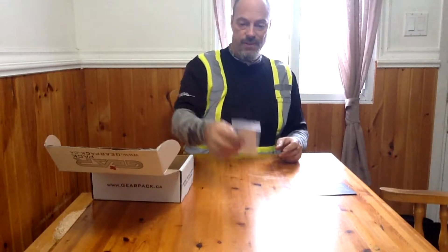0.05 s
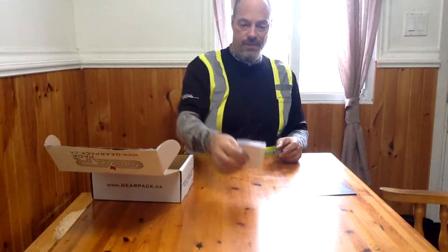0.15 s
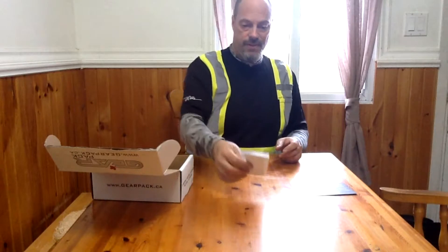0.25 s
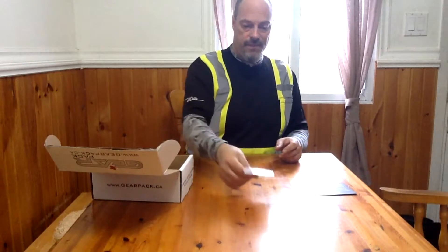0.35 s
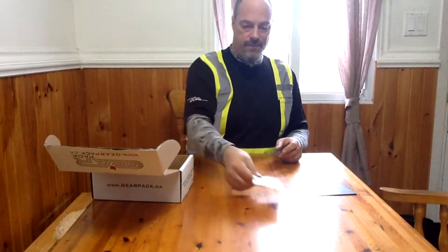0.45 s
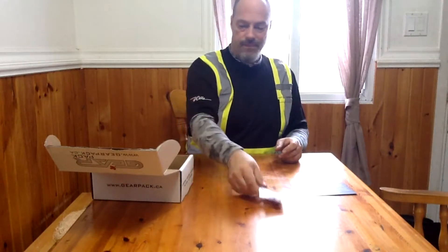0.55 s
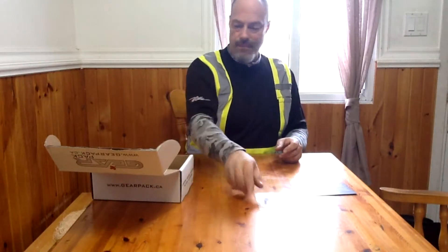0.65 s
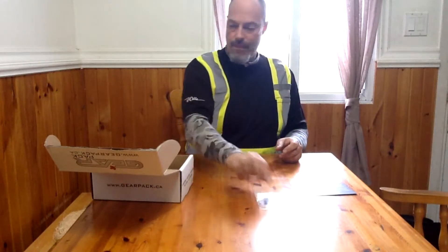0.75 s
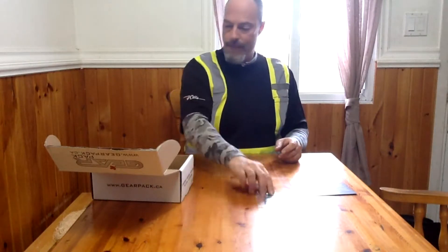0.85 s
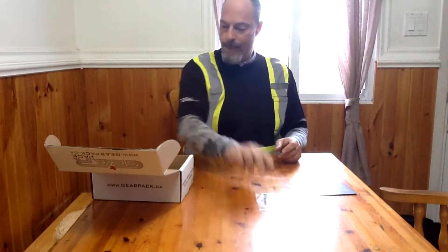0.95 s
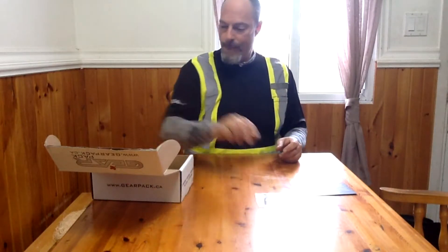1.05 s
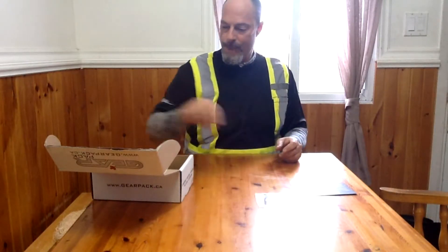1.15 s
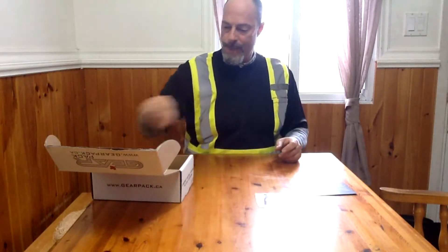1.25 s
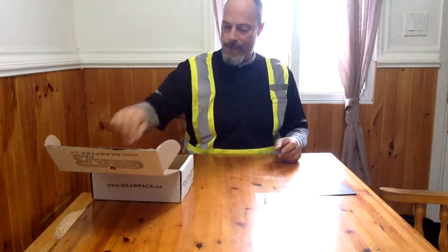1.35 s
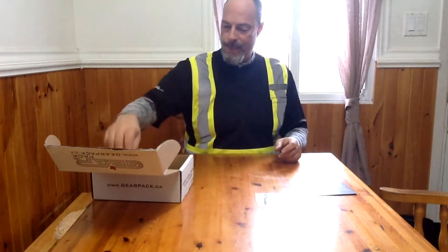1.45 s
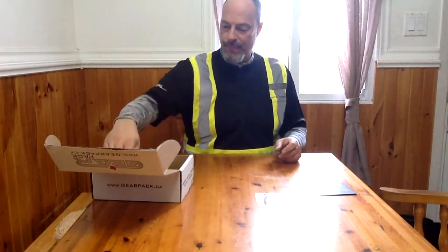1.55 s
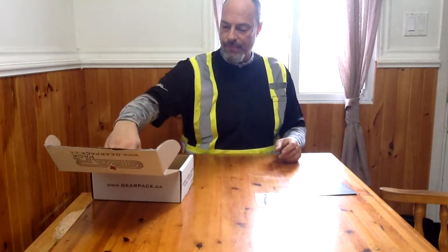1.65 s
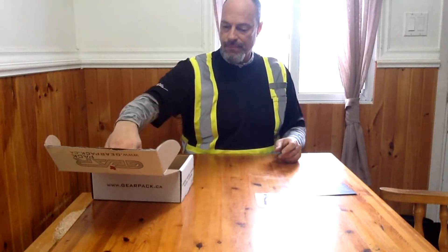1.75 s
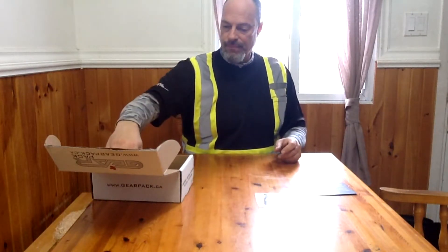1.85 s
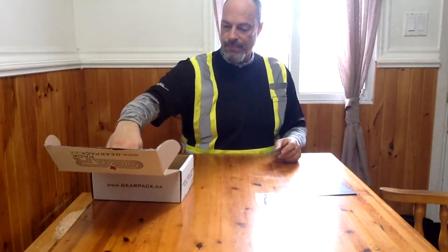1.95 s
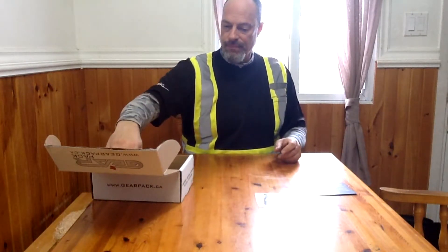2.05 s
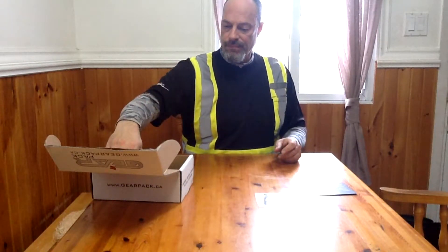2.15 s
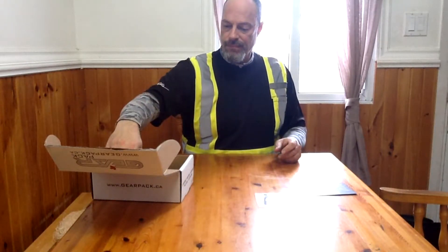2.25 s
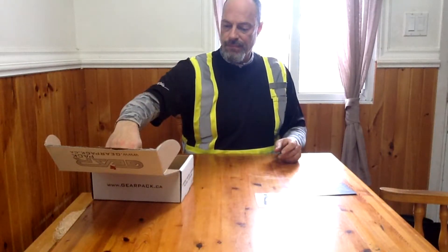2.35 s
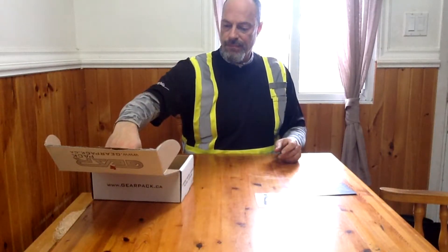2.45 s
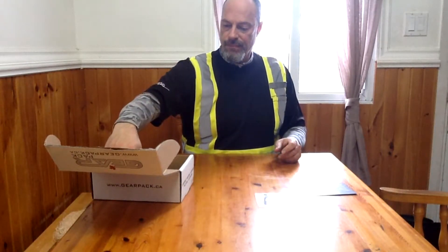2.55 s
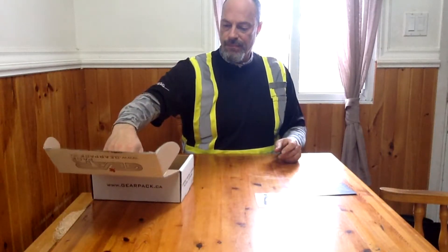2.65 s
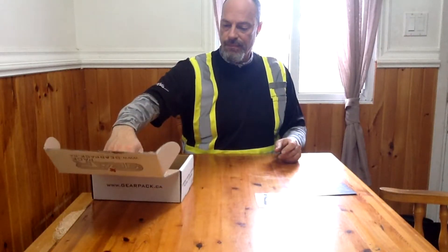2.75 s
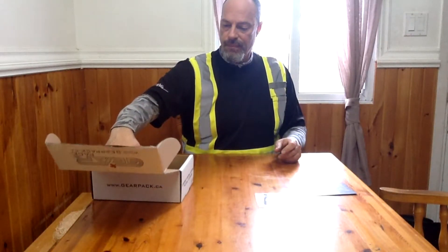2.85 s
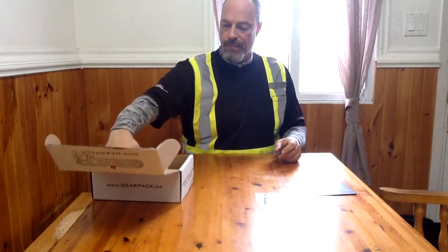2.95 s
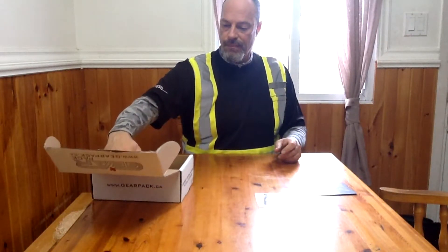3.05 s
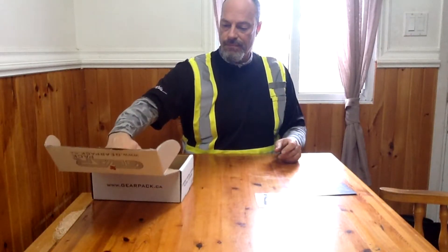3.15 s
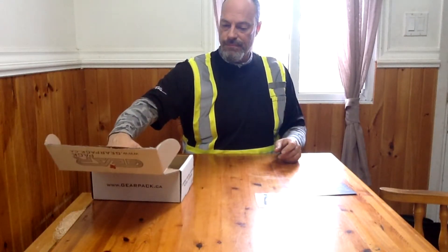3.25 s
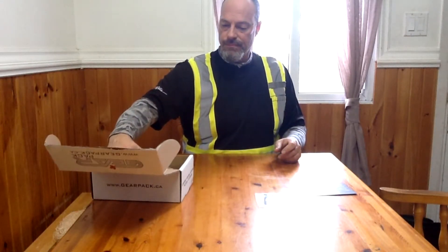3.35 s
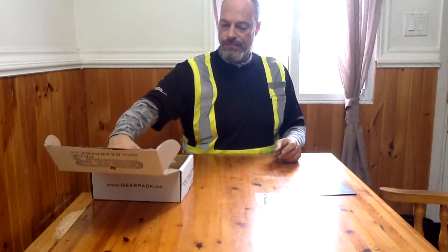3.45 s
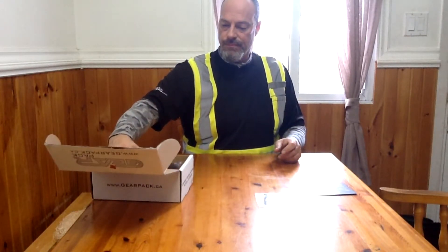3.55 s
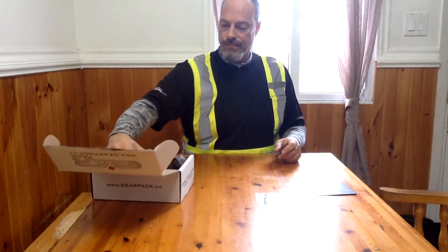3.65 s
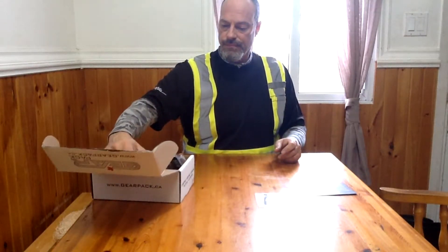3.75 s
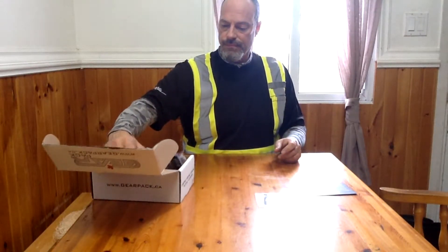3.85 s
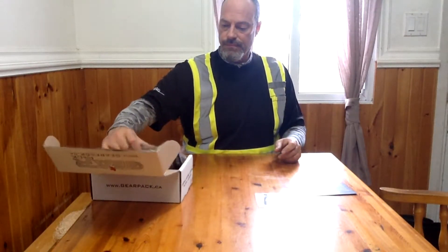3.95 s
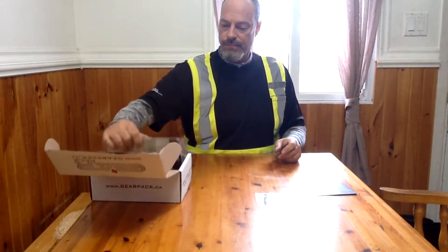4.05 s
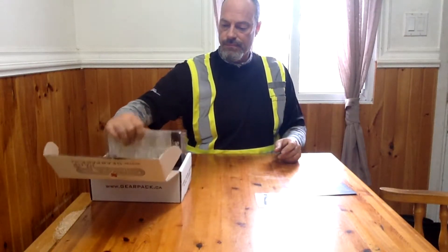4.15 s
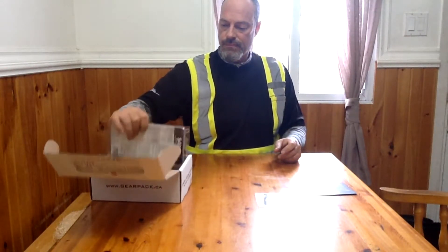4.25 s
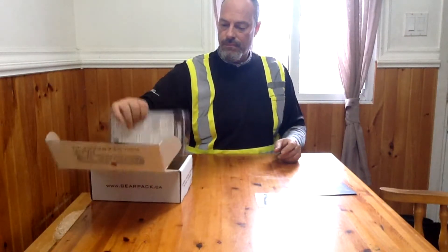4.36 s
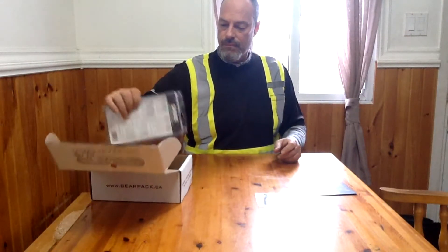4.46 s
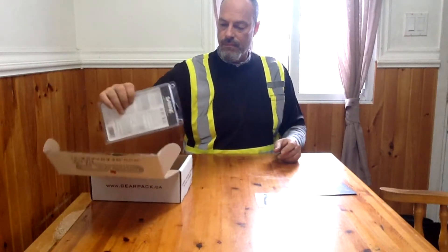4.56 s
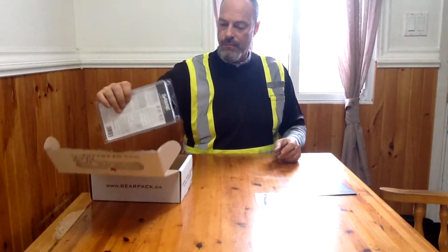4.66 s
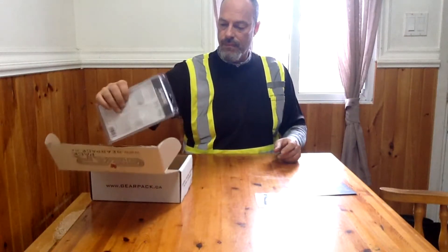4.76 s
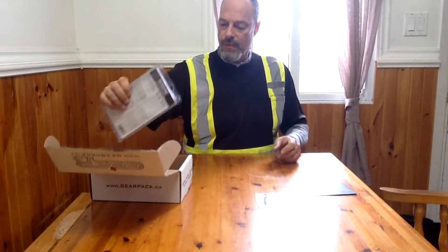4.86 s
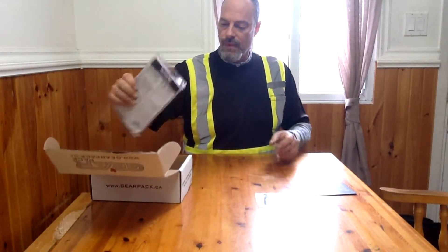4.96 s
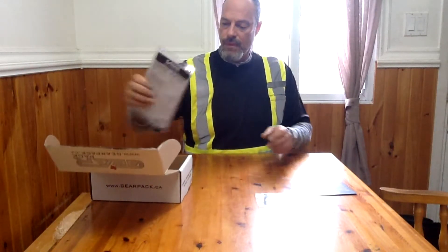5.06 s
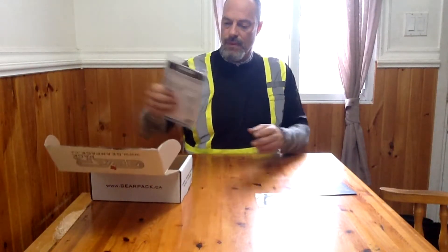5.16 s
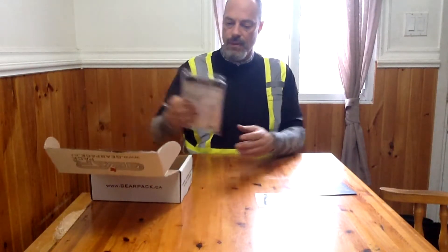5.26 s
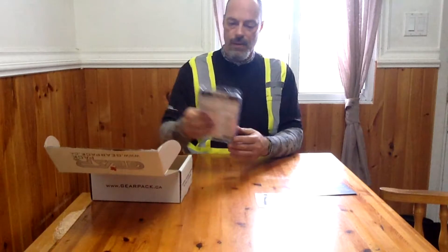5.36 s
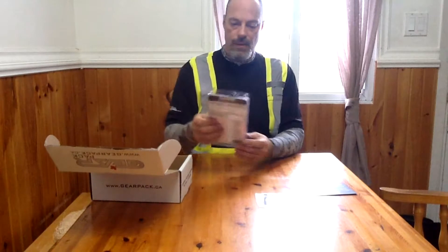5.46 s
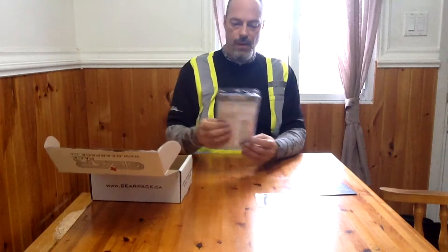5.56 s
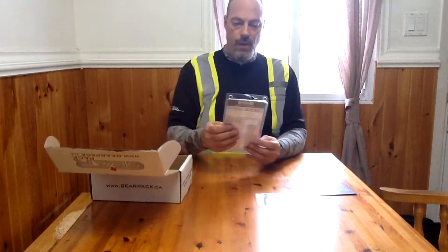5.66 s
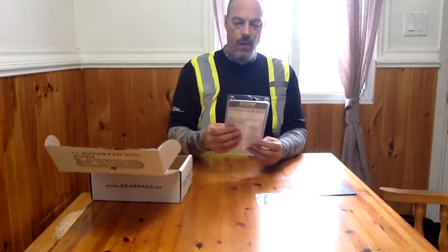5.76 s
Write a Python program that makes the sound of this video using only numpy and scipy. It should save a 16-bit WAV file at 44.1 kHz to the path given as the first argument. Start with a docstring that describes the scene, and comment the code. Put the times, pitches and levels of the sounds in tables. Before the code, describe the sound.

One hard slap on wood, followed by soft cardboard scraping, knocks and plastic film crackles in a small, quietly humming room.

```python
"""Unpacking a wrapped card

A hand slaps a small packet on a wooden table, rummages in a cardboard box and lifts out a film-wrapped card.
Film ticks and snaps and the hard click of the slap are coloured noise bursts; cardboard knocks and table
thuds are decaying modes. Scrape, rustle and rubbing are clumped random slips, filtered or rung through
the resonances of box and card. A small hard room answers with a sparse decaying tail, over hum and hiss.
"""
import sys
import numpy as np
from scipy import signal
from scipy.io import wavfile
from scipy.ndimage import uniform_filter1d

SR = 44100
rng = np.random.default_rng(int(sys.argv[2]) if len(sys.argv) > 2 else 0)


def bounce(signal):
    """Save signal as a 16-bit WAV file at the path given by the first command-line argument."""
    frames = np.transpose(np.atleast_2d(signal))
    limited = np.clip(frames, -1, 1)
    pcm = np.round(limited * 32767).astype(np.int16)
    wavfile.write(sys.argv[1], SR, pcm)


N = 255515  # length in samples


def gain_of(db):
    """Level law: an amplitude ratio is ten to the power of dB / 20."""
    return 10 ** (np.asarray(db) / 20)


def evened(x):
    """Normalisation by effective value: scales a signal to rms 1."""
    return x / np.sqrt(np.mean(x ** 2) + 1e-20)


def add(mix, start_s, sound):
    """Superposition: adds a sound to the mix at its start time, cut at the end of the mix."""
    part = mix[round(start_s * SR):][:len(sound)]
    part += sound[:len(part)]


def read(points, hz):
    """Interpolation of a table along a logarithmic frequency axis."""
    point_hz, value = np.transpose(points)
    return np.interp(np.log(hz + 1), np.log(point_hz + 1), value)


def colour(x, points, size=2048):
    """Minimum-phase filtering: the spectrum is shaped causally, so clicks stay sharp."""
    bin_hz = abs(np.fft.fftfreq(size, 1 / SR))
    log_gain = np.log(gain_of(np.maximum(read(points, bin_hz), -100)))
    # the Hilbert transform of the log gain supplies the minimum phase
    response = np.exp(np.conj(signal.hilbert(log_gain)))
    taps = np.fft.ifft(response).real
    return signal.oaconvolve(x, taps)[:len(x)]


def ring(x, hz, width_hz):
    """Damped resonance: one complex pole, with a gain of about 1 at its peak."""
    radius = np.exp(-np.pi * width_hz / SR)
    pole = radius * np.exp(2j * np.pi * hz / SR)
    return 2 * signal.lfilter([1 - radius], [1, -pole], x).real


def impulse(t):
    """Unit impulse: a single sample of 1 at time zero."""
    return 1. * (t == 0)


# a brighter burst trades ring for treble around these shares
CRACK_RING_DB, CRACK_TREBLE_DB = -1, -5
# film and stiff folds cracking, quick ticks to longer snaps,
# and the hard click of the packet slapping the table at .8427:
# start_s, level_db, ring_hz, brightness_db, time_to_peak_ms, room_share_db
CRACKS_AND_CLICK = [(0.3508, -33.5, 3940, 4, 0.12, 3.5), (0.4303, -30, 2960, -0.5, 0.27, 1),
                    (.584, -36, 2080, -3.5, 2.6, 1.5), (.5877, -35.5, 1920, 8, 1.5, -1.5),
                    (.6876, -29.5, 2000, 3.5, 0.64, 1), (.839, -24.5, 2020, -2, 6.9, 2),
                    (.8427, -5.5, 3350, 6.5, .11, -9), (2.3414, -44, 1840, -3, 0.16, 3),
                    (2.489, -45, 1800, -12, 0.11, 8), (2.6494, -50.5, 1810, 4, 2.5, 3),
                    (2.759, -41, 4040, -1.5, 2.1, 3.5), (2.814, -41, 2160, -13.5, .17, 1.5),
                    (2.894, -46, 2990, 0, 3, -3), (2.9745, -46, 2280, -4, 0.74, 8),
                    (3.021, -41, 2180, -1.5, 1.3, 4.5), (3.081, -35.5, 4100, 1, 2.8, 1.5),
                    (3.1943, -42.5, 3020, -6, 1.3, 1), (3.258, -38.5, 2680, 4, 0.93, -7),
                    (3.405, -24, 2800, -3, 4.7, -1), (3.579, -22.5, 2670, 0.5, 8.8, 1.1),
                    (3.8414, -44, 1790, -3, 0.34, 8.5), (3.868, -50, 2700, 3, 2.6, 6),
                    (3.9684, -44.5, 2560, 2.5, 2.5, -1), (4.168, -47.5, 2800, 4, 0.98, 4),
                    (4.338, -44.5, 3020, 6, 5.5, 3), (4.372, -44, 3480, 5, 5.5, -1),
                    (4.7211, -40.5, 2240, -5, 0.67, 1), (4.957, -42, 3800, 5, 0.86, -6),
                    (5.0818, -39, 2360, -7.5, 0.19, 1), (5.11, -51, 1770, 3.5, 1.3, 5.5),
                    (5.4252, -50, 3620, -2, 2, 3.5), (5.637, -42, 2190, .6, .15, 4)]


def cracks():
    """Impulsive excitation: each crack or click is a noise burst; the walls return one blow of its colour."""
    near, sent, t = np.zeros(N), np.zeros(N), np.arange(2048) / SR
    for start_s, level_db, hz, bright_db, peak_ms, room_db in CRACKS_AND_CLICK:
        peak_ms = max(peak_ms, .03)
        phase = 1000 * t / peak_ms  # 1 at the peak of the envelope
        burst = rng.standard_normal(len(t)) * phase * np.exp(1 - phase)
        ring_db, treble_db = CRACK_RING_DB - bright_db, CRACK_TREBLE_DB + bright_db
        shape = [(500, ring_db - 12.0), (hz * 0.2, ring_db - 0.5), (hz * 0.65, ring_db - 5),
                 (hz * 0.98, ring_db + 4.0), (hz, ring_db + 6.5), (hz * 1.16, ring_db + 1.0),
                 (hz * 1.48, ring_db + 1.0), (6200, 0),
                 (10500, treble_db), (13000, treble_db - 6.5), (16000, treble_db - 11)]
        # burst and blow carry equal energy before colouring, in proportion to the rise time
        energy = peak_ms * SR / 1000
        direct = colour(burst, shape) * np.sqrt(energy / (burst ** 2).sum())
        blow = colour(impulse(t), shape) * np.sqrt(energy)
        add(near, start_s, gain_of(level_db) * direct)
        add(sent, start_s, gain_of(level_db + room_db) * blow)
    return near + room(sent)


# panels that ring longer are thin and stir the room less
KNOCK_ROOM_DB, KNOCK_DRY_DB_PER_S = -6, 155
# the louder a knock reaches the microphone, the smaller the share of room
KNOCK_DRY_PER_DB = 0.3072
# a panel and its untuned neighbours: frequency ratio, amplitude share
PANEL_PARTIALS = [(.62, 0.086), (1, 1), (1.45, 0.074), (2.3, 0.092), (3.6, 0.09)]
# knocks on cardboard: start_s, level_db, pitch_hz, ring_t60_s
CARDBOARD_KNOCKS = [(.363, -57.5, 310, .03), (.429, -60, 930, 0.036), (.584, -43, 885, 0.017),
                    (.688, -38.5, 680, 0.015), (2.213, -52, 510, 0.0085), (2.259, -51.5, 510, 0.016),
                    (2.34, -43.5, 675, 0.0077), (2.462, -44, 770, .034), (2.486, -57, 800, .014),
                    (2.519, -42, 587, 0.0089), (2.629, -42, 653, .048), (2.722, -33, 1200, 0.018),
                    (2.772, -38, 664, 0.028), (2.897, -43, 1210, 0.028), (3.196, -46, 1040, 0.054),
                    (3.259, -55, 1260, .024), (3.407, -23, 518, 0.01), (3.581, -24, 413, 0.034),
                    (3.841, -50, 527, 0.017), (3.918, -37.5, 966, 0.02), (3.965, -41, 543, 0.017),
                    (4.052, -36, 530, 0.015), (4.385, -39.5, 920, 0.051), (4.405, -34, 1043, 0.037),
                    (4.429, -44.5, 903, 0.05), (4.533, -40.5, 895, 0.053), (4.595, -48, 960, 0.072),
                    (4.72, -42, 658, 0.059), (4.724, -49.5, 1507, 0.047), (5.046, -49.5, 1230, 0.027),
                    (5.081, -40.5, 442, .01), (5.109, -43, 1052, 0.041), (5.267, -59, 1200, 0.024),
                    (5.406, -48, 524, 0.0063), (5.427, -38.5, 1094, 0.034), (5.454, -46, 1160, .043),
                    (5.55, -44.5, 1020, .03), (5.556, -52.5, 1530, .04), (5.637, -42, 476, 0.018),
                    (5.637, -43.5, 950, 0.072), (5.679, -61, 965, 0.027)]


def knocks():
    """Impact on damped panels: a broad contact puff starts the ringing and fills the room."""
    near, sent, t = np.zeros(N), np.zeros(N), np.arange(4096) / SR
    for start_s, level_db, hz, t60_s in CARDBOARD_KNOCKS:
        panel = sum(share * np.sin(2 * np.pi * hz * ratio * t) for ratio, share in PANEL_PARTIALS)
        panel *= gain_of(-60 * t / max(t60_s, .005))
        panel *= 1 - np.exp(-t / 0.00052)  # soft onset
        puff_shape = [(hz / 4, -24), (hz * 0.64, -2), (hz * 1.67, -2), (hz * 3, -20), (16000, -70)]
        puff = colour(impulse(t), puff_shape)
        puff /= abs(puff).max()
        room_db = KNOCK_ROOM_DB - KNOCK_DRY_PER_DB * level_db - KNOCK_DRY_DB_PER_S * t60_s
        add(near, start_s, gain_of(level_db) * (panel + 0.47 * puff))
        add(sent, start_s, gain_of(level_db + room_db) * (0.66 * panel + puff))
    return near + room(sent)


PALM_DB, PALM_HZ = 6.5, 267  # a soft, wide blow drives the deepest mode harder
# the low modes' decay times already include the room; only pitches above this feed the separate tail
TAIL_LOW_HZ = 260
# blows into the table top: start_s, level_db, contact_cutoff_hz (higher for a harder contact)
TABLE_BLOWS = [(.059, -50, 232), (0.367, -71, 350), (0.61, -56, 215), (0.688, -66, 600), (.842, -30, 870),
               (1.874, -83, 300), (3.407, -45.5, 510), (3.580, -48.5, 510), (3.678, -53, 298),
               (4.273, -46.5, 197), (5.077, -69, 298)]
# modes of the table top: pitch_hz, relative level_db, t60_s
TABLE_MODES = [(145.6, -2, 0.22), (180, -6.5, 0.37), (193.2, -0.5, 0.25), (216.2, -2.5, 0.3),
               (248.4, -12, 0.097), (305.2, -4.5, 0.21), (325, -1.5, 0.079), (395, -0.5, 0.1),
               (469.6, -1, 0.1), (600, -1, 0.051), (677, 2.5, 0.067), (870, 5, 0.04), (1070, 9.5, 0.015),
               (1360, 12.5, 0.025)]


def thuds():
    """Modal excitation: every blow rings the same table modes; a soft contact leaves out the high ones."""
    out, t = np.zeros(N), np.arange(SR // 2) / SR
    for start_s, level_db, cutoff_hz in TABLE_BLOWS:
        top = np.zeros(len(t))
        for k, (hz, mode_db, t60_s) in enumerate(TABLE_MODES):
            if k == 0:
                mode_db = mode_db + PALM_DB / (1 + (cutoff_hz / PALM_HZ) ** 4)
            sign = (-1) ** k  # neighbouring modes start in opposite phase
            contact = 1 / (1 + (hz / cutoff_hz) ** 4)
            decay = gain_of(mode_db - 60 * t / t60_s)
            top += sign * contact * decay * np.sin(2 * np.pi * hz * t)
        add(out, start_s, gain_of(level_db) * top * (1 - np.exp(-t / 0.0012)))
    sent = signal.sosfilt(signal.butter(4, TAIL_LOW_HZ, "highpass", fs=SR, output="sos"), out)
    return out + gain_of(5.5) * room(sent)


# spectrum of scraped cardboard: frequency_hz, relative level_db (per Hz)
SCRAPE_SPECTRUM = [(59, -50), (100, -23), (146, -7.5), (636, 0.5), (911, -11), (1150, -8), (1390, -15.5),
                   (1640, -18), (2510, -17), (2910, -26), (5000, -23), (6500, -68), (11000, -120)]
# walls and hollow of the box: pitch_hz, width_hz, relative level_db
BOX_RESONANCES = [(485, 52, -15.5), (914, 140, -3.5)]
# spectrum of wrinkling film: frequency_hz, relative level_db (per Hz)
RUSTLE_SPECTRUM = [(900, -38), (1800, -0.5), (2800, 2), (4500, 1), (7000, 2), (11000, -3), (15500, -10.5)]
# the thin wrapped card: pitch_hz, width_hz, relative level_db
CARD_RESONANCES = [(986, 390, -7), (1160, 110, -6), (1406, 240, -8.5)]


def rummage():
    """Stick-slip friction: slips on cardboard ring the box and the card; wrinkling film crackles above."""
    slips = colour(grains(per_s=2700.0, spread_db=3.0, clump_db=5.0, clump_s=0.012), SCRAPE_SPECTRUM)
    box = evened(sum(gain_of(db) * ring(slips, hz, width_hz) for hz, width_hz, db in BOX_RESONANCES))
    scrape = evened(evened(slips) + 0.38 * box)

    wrinkles = grains(per_s=6200.0, spread_db=1.5, clump_db=4.5, clump_s=0.0098)
    rustle = evened(colour(wrinkles, RUSTLE_SPECTRUM))

    rub = grains(per_s=820.0, spread_db=3.5, clump_db=1.0, clump_s=0.017)
    card = evened(sum(gain_of(db) * ring(rub, hz, width_hz) for hz, width_hz, db in CARD_RESONANCES))

    near = strokes(column=2) * scrape + strokes(column=3) * rustle + strokes(column=4) * card
    return gain_of(-1.5) * near + gain_of(-2.5) * room(near)


def grains(per_s, spread_db, clump_db, clump_s):
    """Random point process: slips, most small and a few large, that swell in clumps."""
    clumps = evened(uniform_filter1d(rng.standard_normal(N), round(clump_s * SR)))
    size_db = spread_db * np.minimum(rng.exponential(1, N), 5) + clump_db * clumps
    sign = rng.choice([-1., 1.], N)
    happens = rng.random(N) < per_s / SR
    return gain_of(size_db) * sign * happens


ATTACK_S, SAG_DB, RELEASE_DB_PER_S = 0.023, -6.5, 127
# strokes of the hand among the packing, levels relative to one another:
# start_s, length_s, cardboard_scrape_db, film_rustle_db, fingers_on_card_db
HAND_STROKES = [(1.2, .25, -83, -72, -85), (1.723, 0.16, -71, -65, -70), (1.808, 0.17, -62, -69, -63.5),
                (2.207, 0.38, -64.5, -80, -67.5), (2.467, 0.43, -53, -65, -53.5),
                (2.867, 0.25, -53.5, -62.5, -53.5), (3.087, .17, -54, -59.5, -56),
                (3.587, 0.063, -44, -50.5, -57), (3.84, 0.16, -53, -54, -57.5),
                (3.948, 0.13, -51.5, -58, -58.5), (4.105, 0.3, -57.5, -60.5, -69),
                (4.32, 0.14, -54, -58, -60), (4.453, 0.12, -64, -72, -65), (5.083, 0.37, -75, -69, -72),
                (5.384, 0.19, -60, -61.5, -66), (5.53, 0.15, -58.5, -68.5, -78)]


def strokes(column):
    """Amplitude envelope: each stroke sets in quickly, sags while it lasts and dies away."""
    t, out = np.arange(N) / SR, np.zeros(N)
    for row in HAND_STROKES:
        since, length_s = t - row[0], row[1]
        attack = np.clip(since / ATTACK_S, 0, 1)
        sag_db = SAG_DB * np.clip(since / length_s, 0, 1)
        release_db = RELEASE_DB_PER_S * np.maximum(since - length_s, 0)
        stroke = attack * gain_of(row[column] + sag_db - release_db)
        out = np.maximum(out, stroke)  # the stronger stroke wins an overlap
    return out


# decay of the small hard room: frequency_hz, t60_s
ROOM_DECAY = [(120, 0.53), (400, 0.21), (1400, 0.39), (3000, 0.38), (6000, 0.32), (12000, 0.26)]


def room(x):
    """Reverberation: sparse reflections of random sign, each band dying at its own speed; energy 1."""
    taps = np.zeros(SR // 2)
    slot = np.arange(120, SR // 2 - 12, 12)  # one reflection in every 12 samples
    taps[slot + rng.integers(0, 12, len(slot))] = rng.choice([-1., 1.], len(slot))
    hz, t, bands = signal.stft(taps, SR, nperseg=256)
    decay = gain_of(-60 * t / read(ROOM_DECAY, hz)[:, None])
    tail = signal.istft(bands * decay, SR, nperseg=256)[1]
    return signal.oaconvolve(x, tail / np.linalg.norm(tail))[:N]


AIR_DB = -63.5  # rms level of murmur and hiss together
# room murmur of machines and preamp hiss: frequency_hz, relative level_db (per Hz)
AIR_SPECTRUM = [(15, -54), (25, -27.5), (82, -19.5), (101, -10.5), (164, -4), (215, -6), (281, -4),
                (340, -7), (457, -8.5), (567, -13.5), (631, -12), (1380, -15.5), (2770, -16),
                (15500, -20.5)]
# mains hum: pitch_hz, level_db
MAINS_HUM = (119, -76)


def air():
    """Stationary noise: hiss and low murmur, swelling slightly together, and a steady mains hum."""
    swell = evened(uniform_filter1d(rng.standard_normal(N), 5000))
    hiss = evened(colour(rng.standard_normal(N), AIR_SPECTRUM, size=8192))
    hum_hz, hum_db = MAINS_HUM
    hum = np.sin(2 * np.pi * hum_hz * np.arange(N) / SR)
    return gain_of(AIR_DB + 0.069 * swell) * hiss + gain_of(hum_db) * hum


MIC_LOW_HZ, EDGE_HZ = 108, 15800  # lower limit of the handling sounds, upper limit of everything


def scene():
    """Superposition of all sources at one microphone."""
    handled = cracks() + knocks() + thuds() + rummage()
    # the small microphone drops the deep bass
    handled = signal.sosfilt(signal.butter(6, MIC_LOW_HZ, "highpass", fs=SR, output="sos"), handled)
    return (handled + air())[None]


def record(dry):
    """Band limitation: a linear-phase low-pass ends the treble."""
    lowpass = signal.firwin(511, EDGE_HZ, window=("kaiser", 9), fs=SR)
    return signal.oaconvolve(dry, lowpass[None], "same")


dry = scene()
out = record(dry)
bounce(out)
```